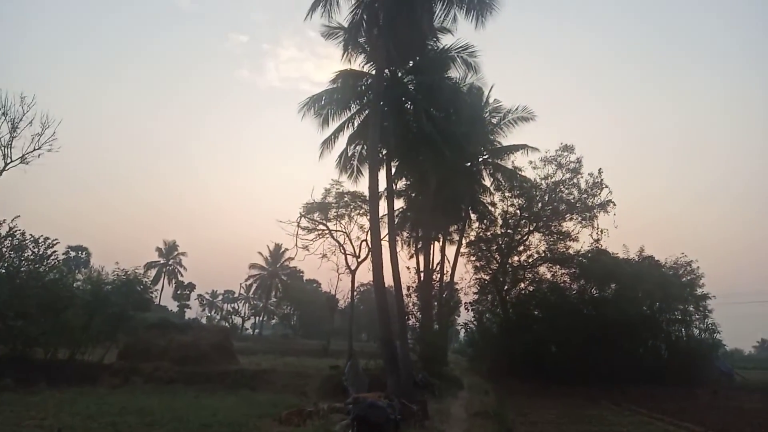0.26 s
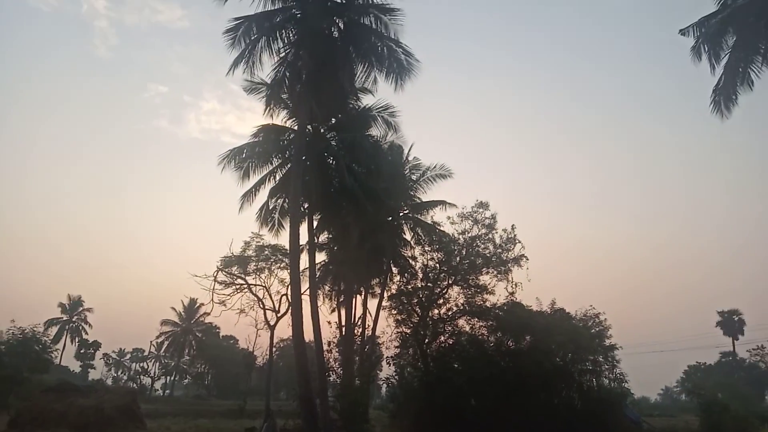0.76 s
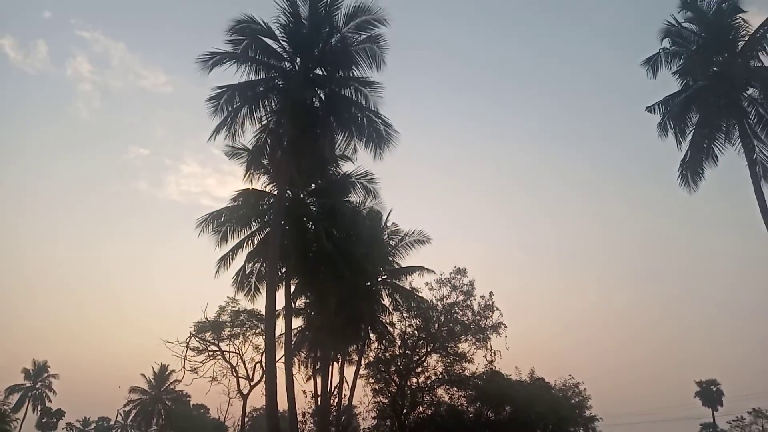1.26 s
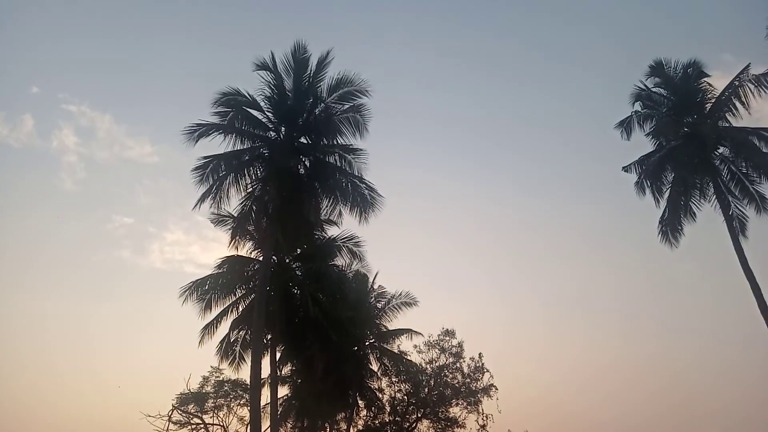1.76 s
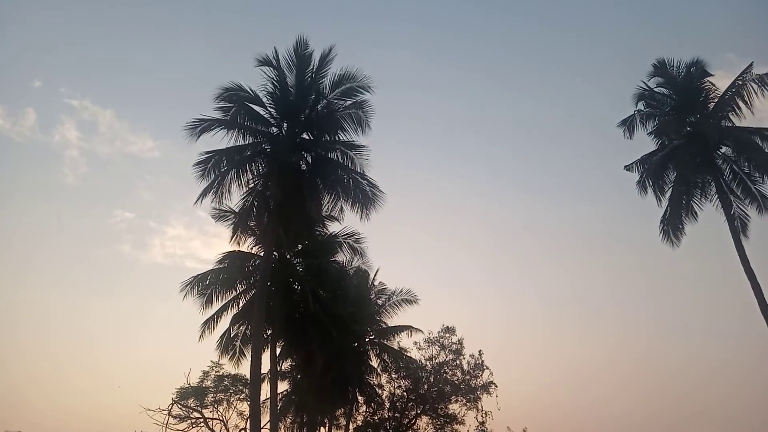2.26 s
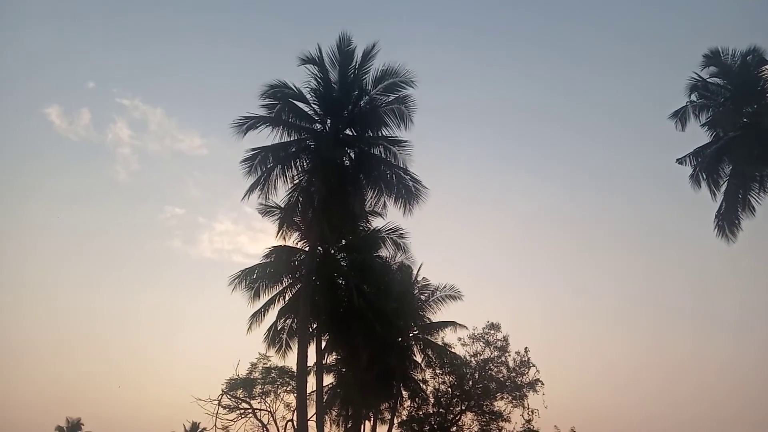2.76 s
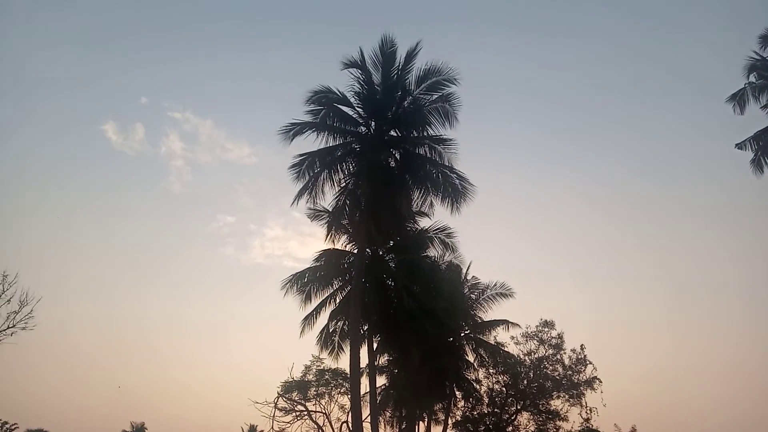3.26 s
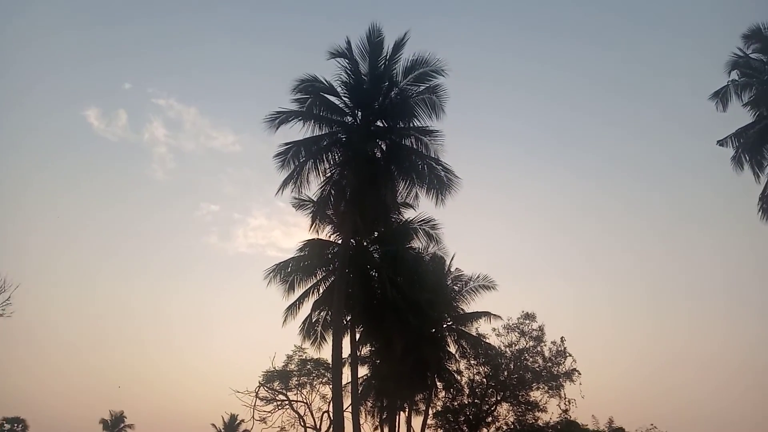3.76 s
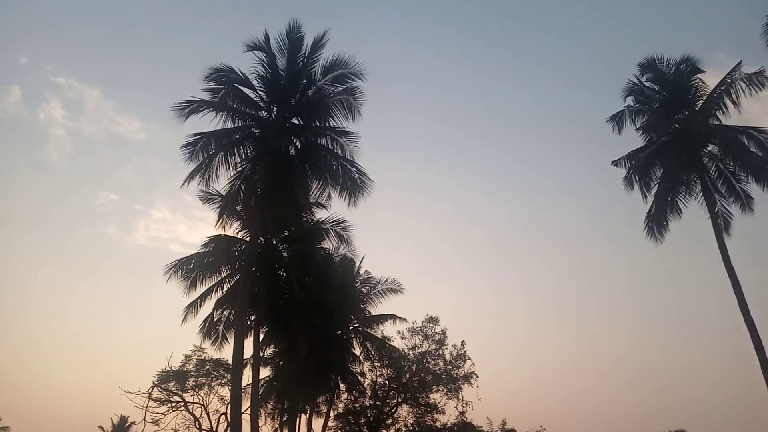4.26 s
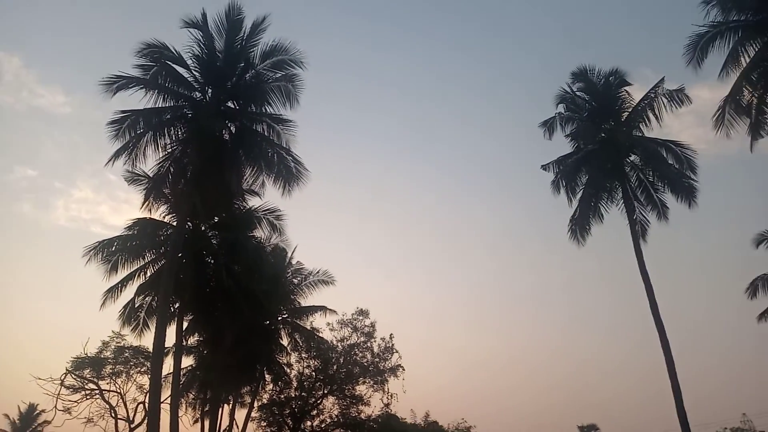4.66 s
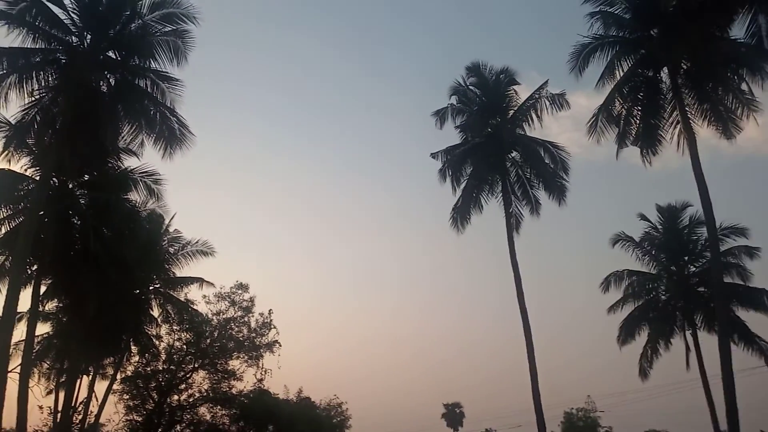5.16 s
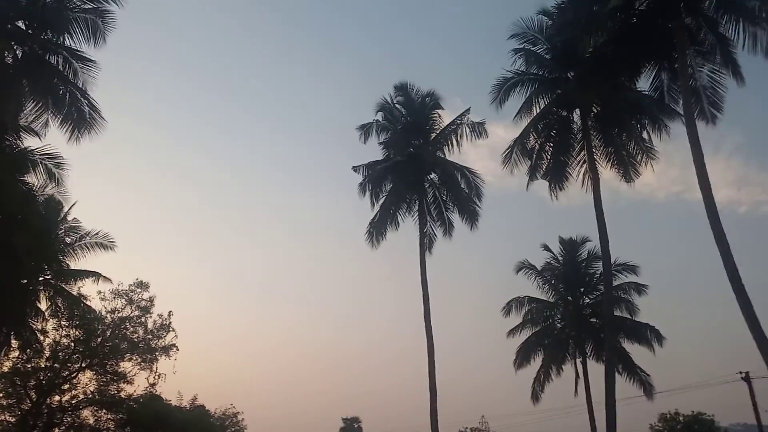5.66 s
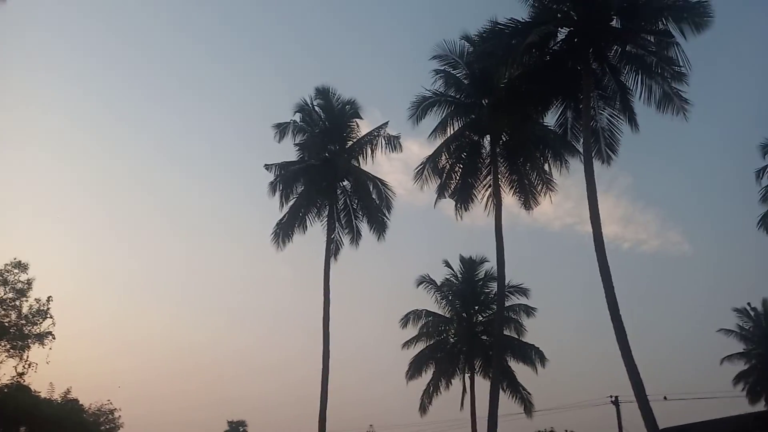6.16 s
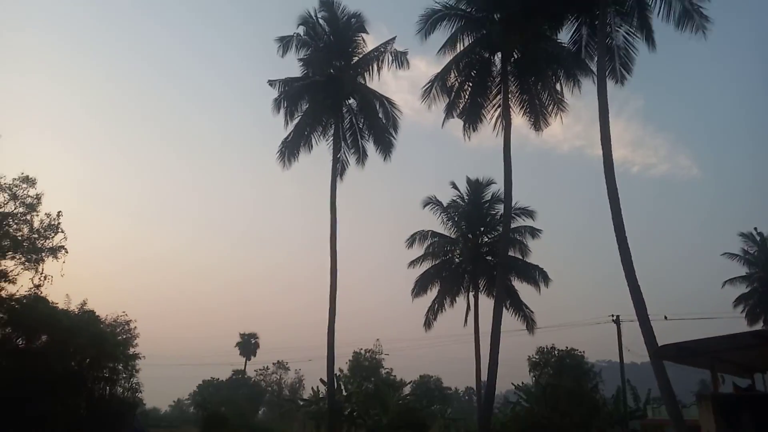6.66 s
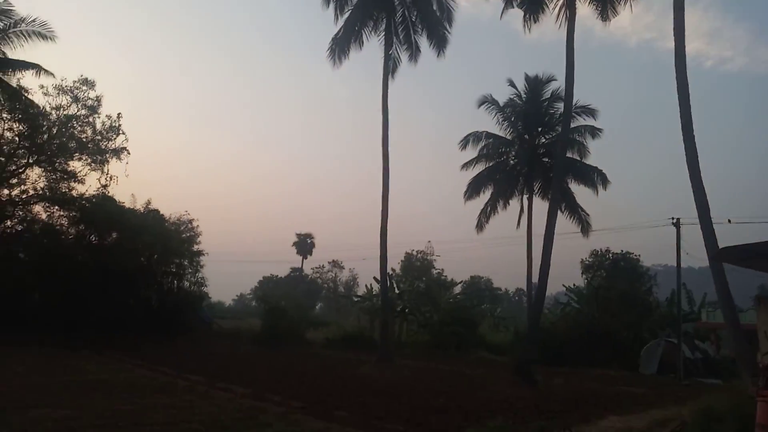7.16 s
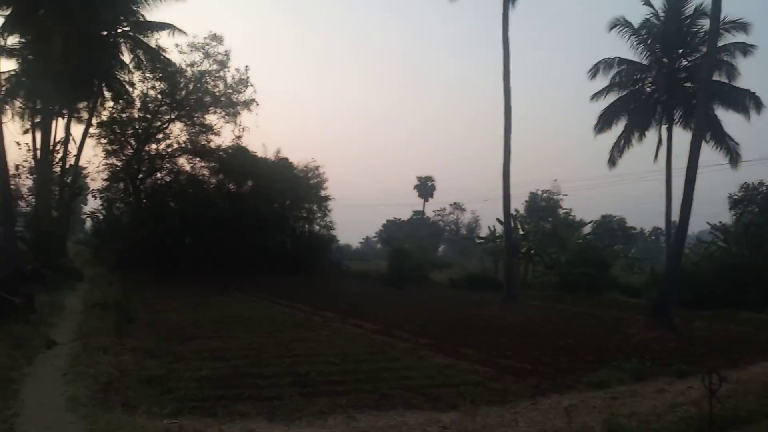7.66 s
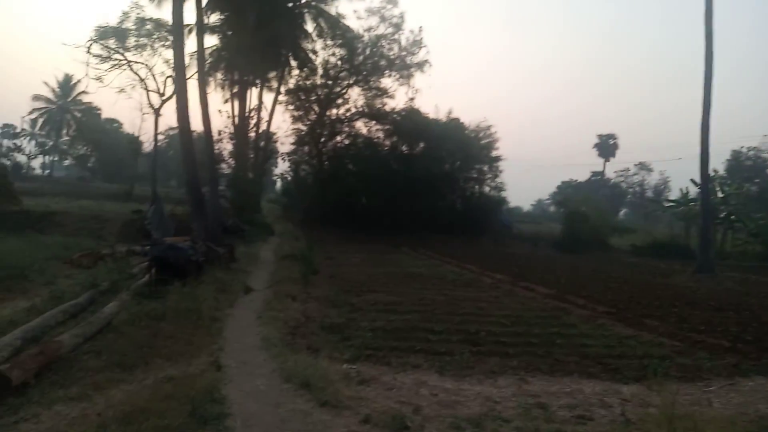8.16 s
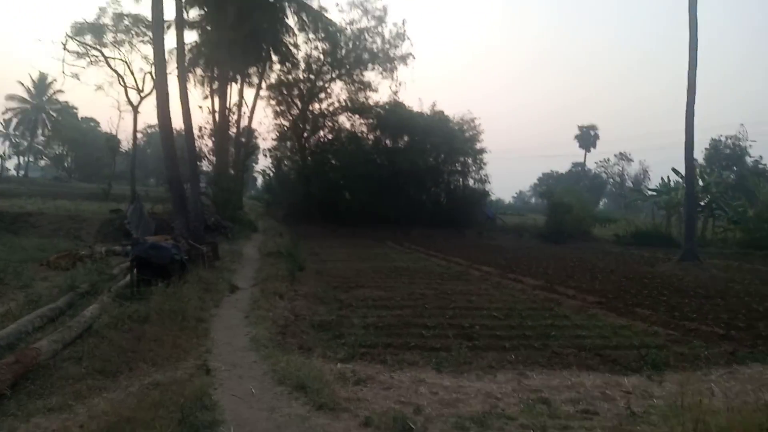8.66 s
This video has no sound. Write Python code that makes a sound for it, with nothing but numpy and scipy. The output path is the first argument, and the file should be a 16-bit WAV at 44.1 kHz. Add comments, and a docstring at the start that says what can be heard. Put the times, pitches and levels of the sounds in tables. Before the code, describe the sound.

Quiet village dawn with birdsong thickening, a distant rooster and crows, soft handling rumble, then a sudden hiss and a burst of close bird chatter.

```python
"""Small birds whistle in the palms at dawn, and late on one chatters close by: gliding, roughened tones.
Far across the village fields a rooster crows (tone and rasp) and crows caw (rattling harmonics).
Insects trill without pause as pulsing bands; leaves and still air are coloured noise.
A soft low rumble of two resonances comes and goes as the camera is swung round; a hand rustles and taps.
Late on a broad hiss opens up, and the camera's microphone keeps nothing above its band limit."""
import sys
import numpy as np
from scipy import signal
from scipy.fft import rfft, irfft, next_fast_len
from scipy.io import wavfile
from scipy.ndimage import uniform_filter1d, map_coordinates

SR = 44100
rng = np.random.default_rng(int(sys.argv[2]) if len(sys.argv) > 2 else 0)


def materialize(psi):
    """Save the field psi as 16-bit PCM at rate SR to the path in sys.argv[1].

    A 1-D psi becomes a single channel; in a 2-D psi each row is a channel.
    """
    bounded = np.clip(np.atleast_2d(psi).T, -1, 1)
    quanta = np.round(bounded * 32767).astype(np.int16)
    wavfile.write(sys.argv[1], SR, quanta)


N = 392931  # samples


def amp(db):
    """Decibels to gain."""
    return 10 ** (np.asarray(db) / 20)


def unit(x):
    """Scale to rms 1."""
    return x / np.sqrt(np.mean(x ** 2) + 1e-20)


def along(points, hz):
    """Interpolate (f/Hz, value) points on a log frequency axis."""
    f, v = np.transpose(points)
    return np.interp(np.log(hz + 1), np.log(f + 1), v)


def curve(rows):
    """One value per sample from (t/s, value) points."""
    s, values = np.transpose(rows)
    return np.interp(np.arange(N) / SR, s, values)


def wobble(rate, size=N):
    """A smooth random curve, rate knots a second."""
    knots = rng.standard_normal(4096)
    return map_coordinates(knots, [np.arange(size) * rate / SR], mode="wrap")


def filtered(x, response):
    """Filter x by a gain that is a function of frequency."""
    m = next_fast_len(len(x) + 8192)
    hz = np.fft.rfftfreq(m, 1 / SR)
    return irfft(rfft(x, m) * response(hz), m)[:len(x)]


def noise(spectrum):
    """Noise of rms 1 with the given colour."""
    return unit(filtered(rng.standard_normal(N), lambda hz: amp(along(spectrum, hz))))


def resonant_noise(centre_hz, width_hz):
    """Noise of rms 1 in one steep-sided resonance, 11.6 dB down half a width from its centre."""
    def resonance(hz):
        return 1 / (1 + ((hz - centre_hz) / width_hz * 2) ** 2) ** 1.93
    return unit(filtered(rng.standard_normal(N), resonance))


def shimmer(spectrum, patchy_db):
    """Coloured noise of rms 1 that swells in small patches of time and pitch, like many blurred calls."""
    z = signal.stft(noise(spectrum), nperseg=512)[2]
    field = uniform_filter1d(rng.standard_normal(z.shape), 3, axis=0)  # across pitch
    field = uniform_filter1d(field, 14, axis=1)  # across time
    return unit(signal.istft(z * amp(patchy_db * unit(field)), nperseg=512)[1][:N])


def swells(rows, rise_db_per_s, fall_db_per_s):
    """Gain of (t/s, length/s, level/dB) events that each rise, hold and die away."""
    t = np.arange(N) / SR
    gain = np.zeros(N)
    for s, length, db in rows:
        near = slice(max(int((s - 1) * SR), 0), int((s + length + 1) * SR))
        before = np.maximum(s - t[near], 0)
        after = np.maximum(t[near] - s - length, 0)
        drop = rise_db_per_s * before + fall_db_per_s * after
        gain[near] = np.maximum(gain[near], amp(db - drop))
    return gain


def add(track, s, sound):
    """Mix a sound in at time s."""
    part = track[max(round(s * SR), 0):][:len(sound)]
    part += sound[:len(part)]


def glide(length, start_hz, middle_hz, end_hz, jitter, jitter_rate, edge):
    """Phase and envelope of one call whose pitch arcs through three points."""
    u = np.linspace(0, 1, max(int(length * SR), 16))
    hz = np.polyval(np.polyfit([0, .5, 1], [start_hz, middle_hz, end_hz], 2), u)
    hz = hz * (1 + jitter * wobble(jitter_rate, size=len(u)))
    return 2 * np.pi * np.cumsum(hz) / SR, signal.windows.tukey(len(u), np.clip(edge, 0, 1))


# how long the trees' longer tail takes to die by 60 dB: f/Hz, t60/s
GROVE_T60 = [(200, 1), (1000, 0.77), (3000, 0.62), (8000, 0.22)]


def grove(x, near_db, tail_db, near_t60):
    """Fronds scatter a sound at once; the trees around answer with a longer tail."""
    hz, t, z = signal.stft(rng.standard_normal(SR), SR, nperseg=256)
    decay = amp(-60 * t / along(GROVE_T60, hz)[:, None])
    tail = signal.istft(z * decay, SR, nperseg=256)[1][:SR]
    near = rng.standard_normal(SR) * amp(-60 * np.arange(SR) / SR / near_t60)
    echo = amp(near_db) * near / np.linalg.norm(near) + amp(tail_db) * tail / np.linalg.norm(tail)
    return x + signal.fftconvolve(x, echo)[:N]


WARBLE_HZ = 48  # rough notes shake in pitch this often


def song(notes, jitter, jitter_rate, flutter_db, edge, second_db, rasp_hz, warble=0):
    """Each note is a gliding tone; roughness spreads energy into a noisy band, warble shakes its pitch."""
    out = np.zeros(N)
    for s, length, start, middle, end, db, rough in notes:
        phase, swell = glide(length, start, middle, end, jitter, jitter_rate, edge)
        size = len(phase)
        share = np.clip(rough, 0, 1) ** 2  # of the energy that is noisy
        shake = np.sin(2 * np.pi * WARBLE_HZ * np.arange(size) / SR)
        phase = phase + warble * share ** 0.58 * middle / WARBLE_HZ * shake
        rasp = wobble(rasp_hz, size=size) * np.sin(phase) + wobble(rasp_hz, size=size) * np.cos(phase)
        tone = np.sin(phase) + amp(second_db) * np.sin(2 * phase)
        voice = np.sqrt(1 - share) * tone + np.sqrt(share) * rasp / np.sqrt(2)
        add(out, s, voice * swell * amp(db + flutter_db * wobble(116.5, size=size)))
    return out


# whistled notes in the palms, and at 7.115 s a lingering echo of the near bird's chatter: t/s, length/s, start
# f/Hz, middle f/Hz, end f/Hz, level/dB before the echo, roughness/0-1
WHISTLE_NOTES = [(0, 0.021, 3420, 3150, 2900, -58, 0.3), (0.05, 0.043, 3390, 3290, 3010, -59, 0.1),
                 (0.37, 0.09, 5240, 5080, 4940, -62, 0.2), (0.71, 0.07, 6300, 6320, 6200, -66.5, 0.3),
                 (0.94, 0.034, 4680, 4970, 5070, -63.5, 0), (1.12, 0.058, 3140, 2910, 2800, -72, 0.5),
                 (1.195, 0.024, 4730, 4900, 5070, -59.5, 0.3), (2.575, 0.033, 5550, 5250, 5000, -57, 0),
                 (2.61, 0.12, 3094, 3050, 3200, -61.5, 0), (2.77, 0.12, 2880, 3000, 3130, -60, 0.24),
                 (3.005, 0.052, 3920, 3610, 3060, -50, 0), (3.124, 0.02, 5500, 5250, 4800, -49.5, 0.05),
                 (3.14, 0.18, 3014, 3357, 2795, -51.5, 0.13), (3.31, 0.053, 2870, 2445, 2030, -58.5, 1),
                 (3.52, 0.074, 3860, 3670, 3554, -45.5, 0.08),
                 (3.635, 0.079, 3860, 3664, 3525, -47.5, 0.17), (3.79, 0.048, 2930, 2590, 2400, -58, 0.7),
                 (3.92, 0.12, 3490, 3290, 3730, -55, 0.47), (4.085, 0.069, 2770, 2590, 2410, -61.5, 0.78),
                 (4.22, 0.11, 3410, 3450, 3930, -57.5, 0.24), (4.31, 0.062, 3830, 3560, 3300, -55, 0),
                 (4.41, 0.083, 2490, 2365, 2610, -68, 0.45), (4.565, 0.094, 3525, 3494, 3890, -53, 0),
                 (4.775, 0.034, 2600, 2430, 2320, -67, 0.4), (5.13, 0.086, 3674, 3455, 3150, -47.5, 0.1),
                 (5.535, 0.16, 3600, 3220, 3080, -52.5, 0), (6, 0.14, 3380, 3160, 2970, -56.5, 0.22),
                 (6.335, 0.031, 4100, 3650, 2950, -65, 0.2), (6.41, .06, 2820, 2814, 2820, -60, 0.25),
                 (6.5, 0.11, 2860, 2780, 2800, -65, 0.25), (6.51, 0.11, 3955, 3970, 3590, -50.5, 0.07),
                 (6.58, 0.099, 3860, 3346, 2680, -52.5, 0.62),
                 (6.755, 0.045, 3070, 2510, 2060, -57.9, 0.56),
                 (6.817, 0.13, 2340.0, 3024, 3060, -54.5, 0.1), (6.94, 0.028, 3200, 2950, 2700, -58.5, 0.2),
                 (7.115, 0.2, 4710, 4520, 4585, -51, 0.36), (7.298, 0.013, 4560, 4570, 4080, -41.5, 0),
                 (7.34, 0.042, 6300, 6390, 6300, -54.5, 0), (7.39, 0.035, 3780, 3510, 3270, -47.5, 0.04),
                 (7.457, 0.026, 3530, 3300, 3100, -52, 0), (7.52, 0.048, 6000, 5930, 5530, -50.5, 0.05),
                 (7.637, 0.13, 4190, 4565, 4700, -47.5, 0.03), (7.75, 0.025, 5180, 5100, 5600, -51, 0.9),
                 (7.88, 0.073, 5950, 6000, 5720, -56.5, 0), (7.942, 0.144, 2900, 3330, 3520, -53.5, 0.22),
                 (8.12, 0.17, 4500, 5360, 5050, -46.5, 0), (8.712, 0.05, 3065, 3123, 3060, -46, 0),
                 (8.84, 0.028, 6730, 6620, 6600, -57, 0.2)]


def whistles():
    """Small birds whistle gliding tones, some of them rough, scattered by the palms."""
    # warble: share of the pitch at full roughness
    notes = song(WHISTLE_NOTES, jitter=0.0081, jitter_rate=244, flutter_db=1.0, edge=0.4,
                 second_db=-34, rasp_hz=604, warble=0.051)
    return grove(notes, near_db=-8, tail_db=-8.5, near_t60=.2)


# faint low tones: far calls, and one low bump as the hiss opens:
# t/s, length/s, start f/Hz, middle f/Hz, end f/Hz, level/dB before the gain and echo
LOW_TONES = [(0, 0.14, 840, 822, 810, -82.5), (0, 0.34, 537, 554, 542, -80.5),
             (0.219, 0.28, 561, 515, 490, -74), (0.3, 0.1, 1530, 1543, 1520, -78.5),
             (1.143, 0.36, 550, 539.5, 656, -69.5), (1.469, 0.37, 750, 751, 760, -69),
             (1.783, 0.46, 640, 592, 575, -64.5), (2.202, 0.43, 701, 616, 513, -67),
             (2.698, 0.11, 696, 705, 670, -72.5), (2.755, 0.14, 491, 459, 473, -71.5),
             (3.044, 0.14, 572, 580, 615, -78.5), (3.22, 0.101, 580, 565, 510, -73),
             (3.335, 0.2, 908, 882, 878, -72), (3.365, 0.11, 482, 449, 420, -71.5),
             (3.618, 0.067, 735, 726, 690, -77), (3.989, 0.1, 1278, 1310, 1330, -82),
             (5.559, 0.06, 302, 308, 296, -75), (5.825, 0.18, 296.5, 308, 289, -70.5),
             (6.262, 0.083, 305, 306, 300, -80), (6.944, 0.11, 356, 337, 323, -68),
             (7.2, 0.094, 339, 330, 330, -73), (7.658, 0.13, 345, 337, 325, -72.5)]


def faint_low_tones():
    """Far calls, and one low bump as the hiss opens: tones equally rough and unsteady in level."""
    rough_notes = [(*row, .45) for row in LOW_TONES]
    tones = song(rough_notes, jitter=0.021, jitter_rate=150, flutter_db=3.5, edge=0.3,
                 second_db=-17.5, rasp_hz=109.3)
    return amp(0.5) * grove(tones, near_db=-6, tail_db=-10.5, near_t60=0.018)


# insect bands: f/Hz, width/Hz, pulse rate/Hz, pulse swing either way/dB, level/dB
INSECT_BANDS = [(4500, 550, 32, -4, -87), (9210, 3900, 23, 1.9, -74)]


def insects():
    """Many small stridulators merge into pulsing bands."""
    out = np.zeros(N)
    for hz, width, rate, depth_db, db in INSECT_BANDS:
        stroke = np.cos(2 * np.pi * np.cumsum(rate * (1 + .008 * wobble(0.89))) / SR)
        out += amp(db) * unit(resonant_noise(hz, width) * amp(depth_db * stroke))
    return out


# one cricket: f/Hz, pulse rate/Hz, level/dB
CRICKET_VOICE = (4290, 47.6, -71.5)


def cricket():
    """Each wing stroke gives a short burst of a slightly wandering tone, over a little resonant noise."""
    hz, rate, db = CRICKET_VOICE
    stroke = np.cos(np.pi * np.cumsum(rate * (1 + .005 * wobble(2))) / SR) ** 4
    tone = np.sin(2 * np.pi * np.cumsum(hz + 60 * wobble(150)) / SR)
    trill = stroke * tone * amp(1.5 * wobble(30))
    return amp(db) * unit(trill + .22 * resonant_noise(hz, 330))


# the two low resonances: f/Hz, width/Hz of the pitch wander
MODES = [(88, 12.94), (152, 28.37)]
# bursts of rumble: t/s, length/s, lower mode level/dB, upper mode level/dB, before the mode gain
BURSTS = [(0, 0.093, -69, -56.5), (0.412, 0.2, -63, -61), (0.71, 0.05, -56, -85), (0.855, 0.38, -70, -60.5),
          (2.115, 0.34, -58.5, -78), (2.242, 0.1, -73, -53), (2.556, .07, -57.5, -87),
          (2.697, .03, -71.5, -68), (2.845, 0.2, -59, -76), (3.277, .08, -66, -89),
          (3.392, 0.12, -55, -55.5), (3.67, .2, -74, -88), (4.716, 0.076, -66, -80.5),
          (5.019, 0.068, -58.5, -62.5), (5.33, .21, -57, -67.5), (5.653, .12, -56, -63.5),
          (5.808, .1, -69, -58), (6.791, .11, -59, -62.5), (6.941, 0.056, -61, -57.5),
          (7.116, 0.065, -55.5, -71), (7.251, 0.043, -63, -59), (7.418, 0.28, -58, -68),
          (7.795, 0.061, -55, -68), (7.905, 0.15, -53.5, -59.5)]


def rumble():
    """Each burst stirs two low resonances that wander in pitch; the upper one has an overtone."""
    bursts = np.array(BURSTS)
    gains = [swells(zip(*bursts.T[:2], levels), rise_db_per_s=646, fall_db_per_s=452)
             for levels in bursts.T[2:]]
    out = amp(-30.5) * gains[1] * resonant_noise(306, 170)  # overtone
    for gain, (hz, width) in zip(gains, MODES):
        phase = 2 * np.pi * np.cumsum(hz + width / 2 * wobble(35)) / SR
        tone = np.sin(phase) * amp(2.34 * wobble(30))
        out += amp(-1.0) * gain * unit(tone + 0.29 * resonant_noise(hz, 4 * width))
    return out


# colour of the far birds together: f/Hz, relative level/dB per Hz
FAR_BIRD_COLOUR = [(2200, -31), (2750, -12), (3150, -6.5), (3900, -0.5), (4600, -6), (5500, -49)]
# bouts in which they sing together: t/s, length/s, level/dB
SINGING_BOUTS = [(0, 0.17, -74), (1.75, 0.37, -70.5), (2.78, 1.03, -65), (4.75, 0.18, -67),
                 (5.3, 0.45, -60.5), (6.2, 0.57, -64.5), (7.1, .12, -59), (8.6, .3, -64)]


def far_birds():
    """Distant song blurs into patchy coloured noise that swells in bouts."""
    gain = swells(SINGING_BOUTS, rise_db_per_s=99, fall_db_per_s=58)
    return gain * shimmer(FAR_BIRD_COLOUR, patchy_db=4.0)


def far_chorus(low_hz=4600, high_hz=7300, count=300):
    """Many distant chirps, blurred by the trees into a shimmering band."""
    out = np.zeros(N)
    for when, length, pitch, slope in rng.random((count, 4)):
        u = np.linspace(0, 1, int((.04 + .08 * length) * SR))
        hz = (low_hz + (high_hz - low_hz) * pitch) * (1 - 0.1 * (slope - .4) * u)
        add(out, when * N / SR, np.sin(np.pi * u) * np.sin(2 * np.pi * np.cumsum(hz) / SR))
    return amp(-75.5) * unit(grove(out, near_db=-3.5, tail_db=6, near_t60=0.24))


# colour of the stirring leaves: f/Hz, relative level/dB per Hz
LEAF_COLOUR = [(3600, -25), (4300, 6.5), (4700, 3), (5200, 0.5), (7000, 0.5), (8000, -10.5), (11000, -13.5),
               (12500, -23), (16000, -39)]
# how much they stir: t/s, level/dB before the flutter
LEAF_STIR = [(0, -65.5), (1.37, -71), (1.7, -65.5), (2.4, -69.5), (3.8, -66.5), (4.35, -75.5),
             (5.15, -67.5), (5.55, -62), (6.05, -64.5), (6.9, -68.5), (7.2, -64), (8.9, -64)]


def leaves():
    """Stirring leaves give treble noise whose level flutters."""
    level_db = curve(LEAF_STIR) + 1.6 * wobble(60) + 2.4 * wobble(9.3)
    return amp(level_db) * shimmer(LEAF_COLOUR, patchy_db=1.7)


# leaf ticks: t/s, level/dB before the 10 dB lift
TICK_LEVEL = [(0, -87.5), (3.8, -85), (4.15, -83), (4.25, -93), (6.8, -107)]
LEAF_RATE = 200  # mean ticks a second


def leaf_ticks():
    """Tiny dry ticks of uneven size, heard in the top of the treble."""
    sizes = amp(3.0 * np.minimum(rng.exponential(size=N), 3))
    ticks = (rng.random(N) < LEAF_RATE / SR) * sizes
    bursts = signal.lfilter([1], [1, -np.exp(-1 / (0.005 * SR))], ticks)  # 5 ms decay
    dry = noise([(4000, -19), (7000, -3.0), (10000, 6.0), (16000, -7.0)])
    return amp(curve(TICK_LEVEL) + 10.0) * unit(bursts * dry)


# colour of the still air: f/Hz, relative level/dB per Hz
AIR_COLOUR = [(20, -19), (45, -1.5), (70, 0), (150, -5), (300, -7), (600, -14), (1200, -22), (3500, -19),
              (8000, -18), (16000, -25.5)]


def air():
    """Still air over the fields: faint noise, strongest in the bass."""
    return amp(-80.5) * shimmer(AIR_COLOUR, patchy_db=-1.5)


# crows far off: t/s, length/s, start f/Hz, middle f/Hz, end f/Hz, level/dB before the echo,
# roughness/0-1, beak resonance f/Hz, fade over the call/dB
CAW_CALLS = [(0.43, .25, 440, 518, 475, -63.5, 0.9, 2100, 13),
             (3.76, 0.22, 646, 661, 622, -64.5, 0.6, 700, 13),
             (5.475, .25, 382, 455, 372, -57, .24, 1050, -2.5),
             (6.185, .4, 508, 505, 412, -55, .2, 1400, 10)]
# the crow's throat: f/Hz, gain/dB
CROW_THROAT = [(300, -76), (600, -20), (820, -3.5), (1000, -6), (1250, -2.5), (1800, 5.5), (2100, -11),
               (2500, -16), (4000, -38), (7000, -49)]


def crows(rattle_hz=80, rattle_depth=0.53):
    """A caw is a harmonic stack, chopped by a slower rattle and shaped by throat and beak."""
    out = np.zeros(N)
    for s, length, start, middle, end, db, rough, beak_hz, fade_db in CAW_CALLS:
        phase, swell = glide(length, start, middle, end, 0.088 * rough, 500, 0.39)
        size = len(phase)
        rattle = 1 + rattle_depth * np.cos(phase * rattle_hz / middle)
        stack = unit(rattle * sum(np.sin(k * phase) for k in range(1, 9)))
        hoarse_air = 1.6 * np.sqrt(rough) * rattle * rng.standard_normal(size)

        def throat_and_beak(hz):
            return amp(along(CROW_THROAT, hz)) / np.hypot(1, (hz - beak_hz) / 700)
        voice = unit(filtered(stack + hoarse_air, throat_and_beak))
        add(out, s, amp(db - np.linspace(0, fade_db, size)) * swell * voice)
    return grove(out, near_db=-3.5, tail_db=-12, near_t60=0.11)


# the rooster's syllables: t/s, length/s, start f/Hz, middle f/Hz, end f/Hz, level/dB before the echo,
# rasp over tone at start/dB, at end/dB
ROOSTER_SYLLABLES = [(1.028, .21, 663, 679, 670, -64.5, -24, -25),
                     (1.28, 0.14, 732, 762, 737, -55, -25, -2), (1.43, 0.76, 754, 727, 683, -57, -27, 26),
                     (2.159, 0.48, 683, 688.5, 649, -67, -6, -5)]
# its clear tone: multiple of the pitch, relative level/dB
ROOSTER_PARTIALS = [(1, -21), (2, 8), (3, -48), (4, -30)]
# its rasp: f/Hz, relative level/dB
ROOSTER_RASP = [(350, -39), (550, 6), (700, 0), (950, -8), (1300, -4.5), (1750, 5.5), (2050, -3),
                (2500, -17), (3600, -18), (5000, -33)]
ATTACK_S, RELEASE_S = 0.025, 0.099


def rooster():
    """Four syllables of tone and rasp; rasp grows in the second and takes over the long third."""
    out = np.zeros(N)
    rasp = shimmer(ROOSTER_RASP, patchy_db=3.5)
    for s, length, start, middle, end, db, first_db, last_db in ROOSTER_SYLLABLES:
        phase, _ = glide(length, start, middle, end, jitter=0.018, jitter_rate=200, edge=0)
        size = len(phase)
        t = np.arange(size) / SR
        swell = np.clip(np.minimum(t / ATTACK_S, (length - t) / RELEASE_S), 0, 1)
        tone = unit(sum(amp(level) * np.sin(k * phase) for k, level in ROOSTER_PARTIALS))
        hoarse = amp(np.linspace(first_db, last_db, size))
        voice = (tone + hoarse * rasp[int(s * SR):][:size]) / np.hypot(1, hoarse)
        add(out, s, amp(db) * swell * voice)
    return grove(out, near_db=-5.5, tail_db=-6, near_t60=0.14)


# dry rustles: t/s, length/s, level/dB
DRY_RUSTLES = [(1.688, 0.015, -55), (3.259, 0.062, -60.5), (3.503, 0.0096, -71), (3.78, 0.033, -66),
               (8.56, 0.075, -56)]
# dull noise bursts, one as the hiss opens, one a finger scrape: t/s, length/s, level/dB
DULL_BURSTS = [(6.935, 0.029, -53.5), (8.7628, 0.051, -48.5)]
# a click and a bump: t/s, length/s, f/Hz, level/dB
CLICK_AND_BUMP = [(8.7628, .0004, 5000, -26), (8.802, .009, 170, -38)]


def rustles_bursts_and_taps():
    """Windowed noise for a hand's rustles, a dull burst and a scrape; brief tones for a click and a bump."""
    out = np.zeros(N)
    dry_colour = noise([(1500, -13), (4000, -5), (7000, 4), (10000, -6), (15000, -17)])
    dull_colour = noise([(200, 1.5), (1000, -0.5), (6000, -0.5), (9000, -29), (15000, -30)])
    for rows, colour, edge in (DRY_RUSTLES, dry_colour, 1), (DULL_BURSTS, dull_colour, .5):
        for s, length, db in rows:
            size = int(length * SR)
            add(out, s, amp(db) * signal.windows.tukey(size, edge) * colour[int(s * SR):][:size])
    t = np.arange(SR // 10) / SR
    for s, length, hz, db in CLICK_AND_BUMP:
        swell = np.sin(np.pi * np.minimum(t / length, 1)) ** 2
        add(out, s, amp(db) * swell * np.sin(2 * np.pi * hz * t))
    return out


# colour of the hiss: f/Hz, relative level/dB per Hz
HISS_COLOUR = [(59, -61), (100, -19), (129, -17), (166, -22), (412, -12.5), (809, -5.5), (1090, -5.5),
               (1310, -4.5), (2090, -5), (3060, -3.5), (3940, -4.5), (5300, -4.5), (6820, -5),
               (8250, -19.5), (15600, -15.5)]
HISS_OPENS_S, HISS_RISE_S = 6.94, 0.0051
HISS_SPLIT_HZ, HISS_WAVER_DB = 350, 1.5  # below the split the hiss wavers


def hiss():
    """A broad hiss that opens abruptly; its low part wavers."""
    opened = np.clip((np.arange(N) / SR - HISS_OPENS_S) / HISS_RISE_S, 0, 1)
    broad = noise(HISS_COLOUR)
    low = filtered(broad, lambda hz: 1 / (1 + (hz / HISS_SPLIT_HZ) ** 4))
    wavering = low * amp(HISS_WAVER_DB * wobble(13))
    return amp(-57.5) * opened * (broad - low + wavering)


# the near bird's two overlapping voices: t/s, length/s, start f/Hz, middle f/Hz, end f/Hz,
# level/dB before windpipe, gain and echo, roughness (held to 1 at most)
CHATTER_NOTES = [(7.066, 0.023, 4880, 4400, 4050, -25, 0.06), (7.067, 0.021, 2930, 2770, 2700, -30, 0.23),
                 (7.086, 0.028, 3950, 3890, 3550, -35, 1.1), (7.087, 0.0244, 2410, 2343, 2140, -19.5, 0.1),
                 (7.1, 0.0162, 4700, 4500, 4020, -22.5, 0.1), (7.146, 0.044, 3370, 3550, 3500, -35, 0.9),
                 (7.147, 0.0325, 2786, 2270, 2280, -21, 0.2), (7.155, 0.015, 4740, 4460, 4230, -32, 0.1),
                 (7.179, 0.0058, 3520, 3170, 3020, -21.5, 0.5), (7.185, 0.009, 2900, 2840, 2740, -25, 0.2),
                 (7.211, 0.02, 2910, 2910, 2920, -22.5, 0.54),
                 (7.217, 0.028, 2554, 2310, 2240, -23.5, 0.26), (7.222, 0.033, 4780, 4290, 4000, -40, 0.1),
                 (7.241, 0.031, 2930, 2854, 2720, -31, 0.4)]
# its windpipe: f/Hz, gain/dB
BIRD_WINDPIPE = [(1600, -58), (2100, -16), (2400, -2.5), (4900, -2.5), (5500, -15), (7000, 3), (9000, -30)]


def chatter():
    """One bird close to the microphone: two quick voices shaped by the windpipe, with little echo."""
    notes = song(CHATTER_NOTES, jitter=0.016, jitter_rate=1120, flutter_db=2.5, edge=0.37,
                 second_db=-22, rasp_hz=1564)
    voice = filtered(notes, lambda hz: amp(along(BIRD_WINDPIPE, hz)))
    return amp(.8) * grove(voice, near_db=-15, tail_db=-25, near_t60=.06)


def scene():
    """Near and far birds over the morning's background."""
    birds = whistles() + crows() + rooster() + chatter()
    small_life = insects() + cricket()
    background = far_birds() + far_chorus() + leaves() + leaf_ticks() + air()
    low_sounds = faint_low_tones() + rumble()
    return (birds + small_life + background + low_sounds + rustles_bursts_and_taps() + hiss())[None]


TOP_HZ = 15750


def record(dry):
    """The camera's microphone keeps nothing above its band limit."""
    return filtered(dry[0], lambda hz: hz < TOP_HZ)[None]


dry = scene()
out = record(dry)
materialize(out)
```